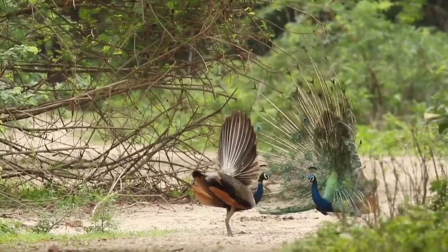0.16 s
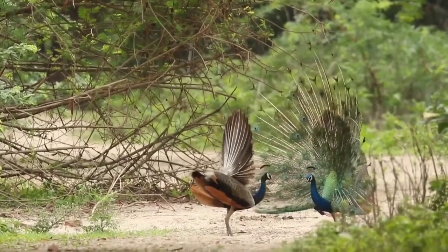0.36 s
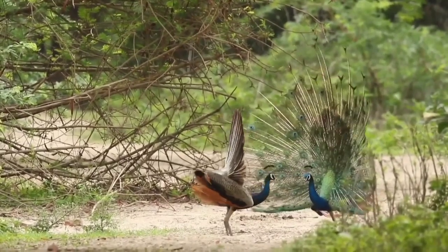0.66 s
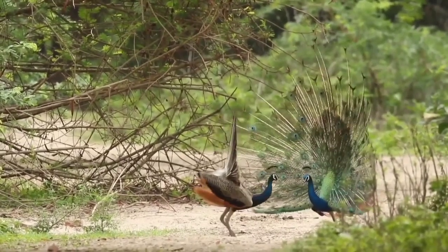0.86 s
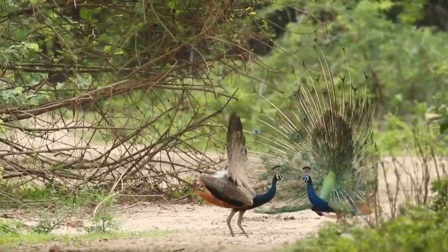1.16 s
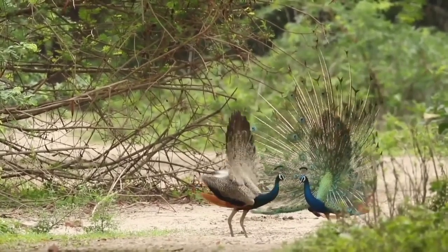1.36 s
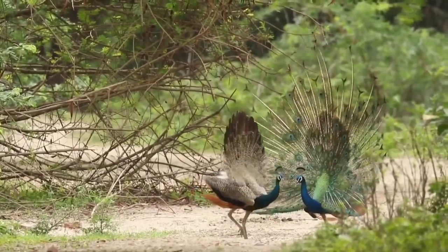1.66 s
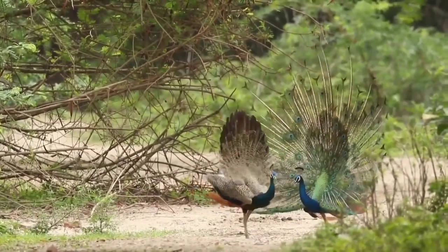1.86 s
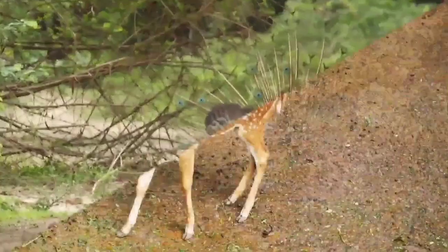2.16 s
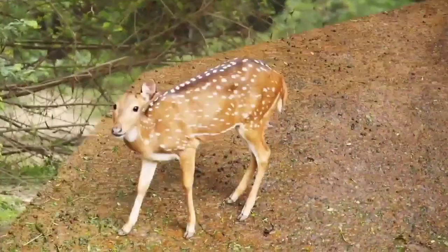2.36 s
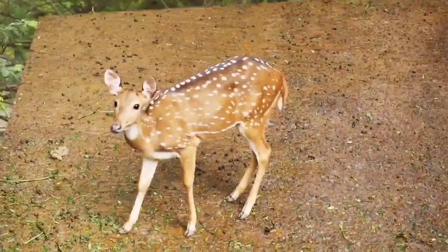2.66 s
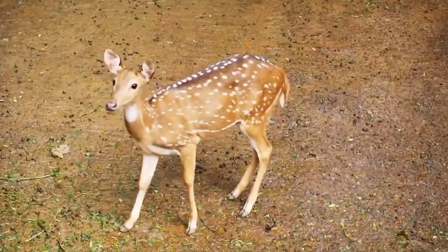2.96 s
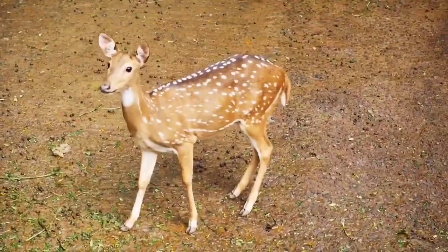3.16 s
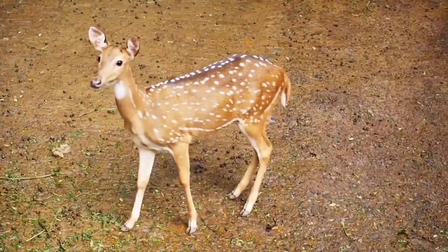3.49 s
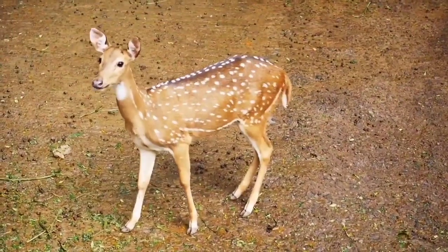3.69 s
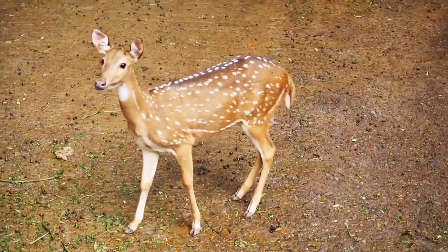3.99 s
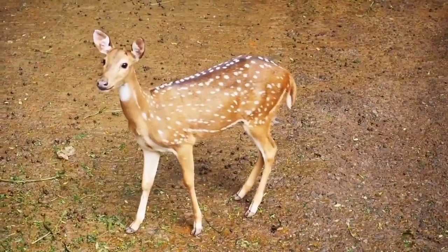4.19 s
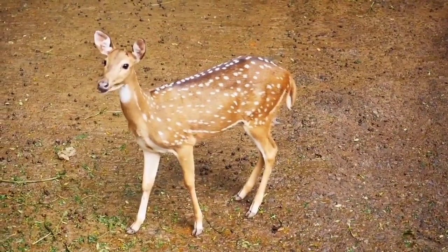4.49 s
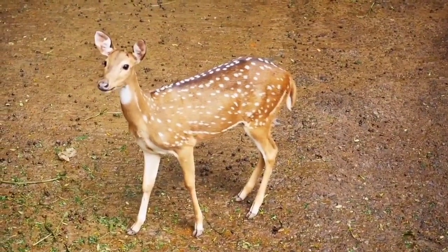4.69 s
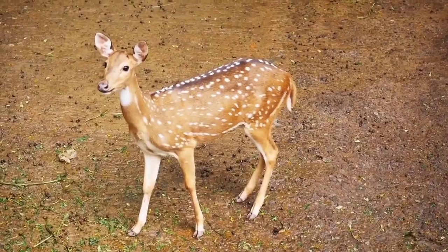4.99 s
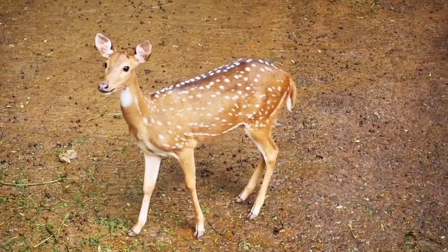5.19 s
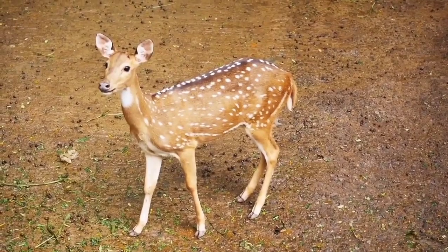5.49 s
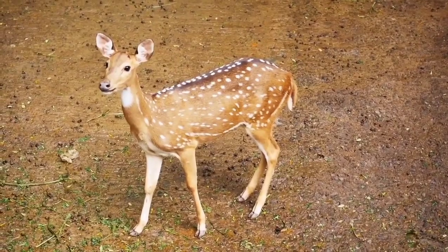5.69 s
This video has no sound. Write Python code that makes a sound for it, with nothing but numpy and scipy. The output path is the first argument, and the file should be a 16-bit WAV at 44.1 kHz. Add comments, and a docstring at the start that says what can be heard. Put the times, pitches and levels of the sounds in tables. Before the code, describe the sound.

First scene: open scrubland, airy broadband hush, a peacock's brassy cry leaping up and falling, close and clear, a few faint far notes and ticks after. It fades out to a short silence. Second scene: dark low forest hush, a stag's pulsed groan opening into a rough, deep roar, reverberant among trunks, a pause filled with echo, then another roar, still bellowing as the sound stops.

```python
"""A stag roars twice in a forest: each roar starts as a pulsed groan, then its larynx sinks, the throat
resonances slide down and the voice turns loud and harsh. Fold pulses and air puffs drive moving resonances;
sparse echoes make the trees ring after it. Before that, a peacock gives one long arched cry, a stack of
harmonics, over the wash of open scrubland with soft notes and a ticking insect. The wash, shaped noise,
fades to silence before the forest air, also shaped noise, sets in."""
import sys
import numpy as np
from scipy import signal
from scipy.fft import rfft, irfft
from scipy.io import wavfile
from scipy.ndimage import uniform_filter1d

SR = 44100
rng = np.random.default_rng(int(sys.argv[2]) if len(sys.argv) > 2 else 0)


def bounce(signal):
    """Save signal as a 16-bit WAV file at the path given by the first command-line argument."""
    frames = np.transpose(np.atleast_2d(signal))
    limited = np.clip(frames, -1, 1)
    pcm = np.round(limited * 32767).astype(np.int16)
    wavfile.write(sys.argv[1], SR, pcm)


N = 257984
TIME = np.arange(N) / SR

# The roars. Each row: start in seconds, end in seconds, moment the larynx is half sunk in seconds,
# time scale of the sinking in seconds, moment the bellow breaks out in seconds,
# moment the chest tone has half joined in seconds.
ROARS = [(3.003, 4.409, 3.40, 0.22, 3.585, 3.46), (4.967, 5.85, 5.46, 0.34, 5.645, 5.69)]
# The stag's vocal folds, one list per roar. Each row: time in seconds, pitch in Hz once the opening
# creak is over, roughness from 0 to 1.
FOLDS = [
    [(3.28, 124.9, 0.19), (3.41, 126.1, 0.4), (3.455, 175.6, 0.4), (3.57, 206.3, 0.3), (3.72, 202.8, .66),
     (3.88, 191.1, .7), (3.99, 189.5, .62), (4.04, 177, 0), (4.09, 177.2, .14), (4.2, 162.3, .58),
     (4.33, 102.8, .6), (4.42, 84.7, 0.49)],
    [(5.1, 114.2, 0.3), (5.35, 114.5, 0.07), (5.56, 121.6, .16), (5.67, 137.1, .25), (5.72, 159.6, 0.39),
     (5.85, 168.5, 0.57)],
]
# Vocal effort, one list per roar. Each row: time in seconds, level in dB before the overall trim.
EFFORT = [
    [(3.03, -51.5), (3.116, -28), (3.494, -15.5), (3.51, -11.5), (3.638, -9.5), (3.658, -13.5),
     (3.958, -12), (3.968, -16), (4.044, -13), (4.39, -20.5)],
    [(4.985, -37.5), (5.069, -29), (5.421, -21.5), (5.497, -18.5), (5.513, -22.5), (5.559, -12.5),
     (5.589, -16), (5.655, -9.5), (5.699, -14), (5.791, -14.5), (5.83, -12.5)],
]
# Quick reflections from near trunks. Each row: frequency in Hz, decay time t60 in seconds.
NEAR_T60 = [(200, .22), (1000, .15), (4000, .13)]
NEAR_DB, NEAR_BUILD_S = -9.5, 0.0012
# Pitches at which the forest rings on. Each row: frequency in Hz, width in Hz, gain in dB of the added resonance.
RINGS = [(336.4, 60, 10), (413, 120, 1), (478, 31, 8), (756, 160, 8), (1208, 41, 11.5), (1870, 330, 1.5)]
# Long decay among the trees. Each row: frequency in Hz, decay time t60 in seconds.
TREES_T60 = [(170, 0.59), (400, 1.82), (1000, 1.59), (2200, 2.22), (3500, 2.4), (9000, .6)]
TREES_DB, TREES_BUILD_S = -13.5, 0.053
# Level difference between the ears. Each row: frequency in Hz, left minus right in dB.
STAG_SIDE = [(110, -.5), (200, -2.2), (380, 1.5), (700, .7), (1290, 3.5), (2380, 1.7), (4400, 4), (9000, 0)]
# Phase difference between the ears. Each row: frequency in Hz, lead of the left ear in radians.
STAG_PHASE = [(200, 0), (380, .8), (550, .4), (1000, 0), (5000, -.3)]


def stag():
    """Reverberation: two roars, with quick reflections from near trunks and the long ring of the forest."""
    dry = np.zeros(N)
    for row, folds_curve, effort_curve in zip(ROARS, FOLDS, EFFORT):
        start, sound = roar(row, folds_curve, effort_curve)
        add(dry, start, sound)
    near = gain_of(NEAR_DB) * echoes(dry, NEAR_T60, NEAR_BUILD_S)
    ringing = dry + sum(gain_of(db) * resonate(dry, np.full(N, hz), width) for hz, width, db in RINGS)
    far = gain_of(TREES_DB) * echoes(ringing, TREES_T60, TREES_BUILD_S)
    # half of each interaural difference goes to either ear
    hz = np.fft.rfftfreq(2 * N, 1 / SR)
    ears = np.array([[0.5], [-0.5]])
    place = gain_of(ears * read(STAG_SIDE, hz)) * np.exp(1j * ears * read(STAG_PHASE, hz))
    closing = ramp((TIME[-1] - TIME) / 0.008)
    return irfft(rfft((dry + near + far) * closing, 2 * N) * place)[:, :N]


# Each roar starts as a slow creak, at this share of its pitch, that speeds up to it.
CREAK_SHARE, CREAK_S = 0.47, 0.16
LARYNX_REST = 0.075  # how far the larynx has sunk at the start, 0-1
OPEN_AIR = 0.39  # least share of air through the fully lowered throat, even when the voice is clear
# The chest resonance: frequency in Hz with larynx high, frequency in Hz with larynx low, width in Hz.
BOOM = (230.6, 198.5, 54)
# the chest tone against the effort, before and after it joins, and how long that takes
CHEST_SHUT_DB, CHEST_OPEN_DB, CHEST_OPENS_S = -11.5, 4, 0.076
CHEST_FULL_DB = -14.5  # beyond this effort the chest tone grows no louder
SURGE_S = 0.076  # half length of the surge as the bellow breaks out
# Lower throat resonances. Each row: frequency in Hz with larynx high, frequency in Hz with larynx low,
# relative level in dB with larynx high, relative level in dB with larynx low.
THROAT = [(683, 404.6, -11, 11.5), (993, 439.6, -1.5, 7.5), (1485, 904, -4, 6.5), (1557, 961, -1, -13.5),
          (1723, 1267, 2.5, -3), (1986, 1505, -4, -7), (1954, 1780, -19, -14.5), (2257, 1990, -21.5, -8),
          (2290, 2250, -30, -12)]
# Upper resonances. Each row: frequency in Hz with larynx high, frequency in Hz with larynx low,
# relative level in dB with larynx high, relative level in dB with larynx low.
MUZZLE = [(3150, 2300, -0.5, 12.5), (3710, 2600, -0.5, 3.5), (4060, 3168, -15, 4), (3307, 3500, 1, -2.5),
          (2770, 3850, -12.5, -5.5), (4080, 4226, -21.5, -8.5), (4950, 5290, -30.5, -14.5),
          (5750, 6450, -32, -22)]


def roar(row, folds_curve, effort_curve, jitter=0.034, shimmer=0.74, hiss=1.0, attack_s=0.052,
         release_s=0.05, air_db=-32, snap_db=-10, level_db=-1.09):
    """Source and filter: fold pulses, mixed with air puffs as they roughen, drive the long throat."""
    start, end, sink_at, sink_s, break_at, chest_at = row
    t = np.arange(start, end + release_s, 1 / SR)
    hz, rough = curves(folds_curve, t)
    rough = np.clip(rough, 0, 1)
    effort = curves(effort_curve, t)[0] + level_db
    hz = hz * (CREAK_SHARE + (1 - CREAK_SHARE) * ramp((t - start) / CREAK_S))
    descent = (1 + np.tanh(2 * (t - sink_at) / sink_s)) / 2
    sunk = np.clip(LARYNX_REST + (1 - LARYNX_REST) * descent, 0, 1)
    turns = np.cumsum(hz * (1 + jitter * rough * wander(t, 98))) / SR

    # the fold harmonics reach up to about 4 kHz
    folds = sum(np.clip((4100 - k * hz) / 400, 0, 1) * np.cos(2 * np.pi * k * turns) for k in range(1, 64))
    pulses = 0.5 * steadied(folds) * (1 + shimmer * rough * wander(t, 87))
    # air noise, strongest just after each pulse
    puffs = evened((0.35 + np.exp(-(turns % 1) / 0.18)) * rng.standard_normal(N)[:len(t)])
    drive = (1 - rough) * pulses + hiss * rough * puffs

    # the lowest resonance favours the harmonic nearest to it
    high_hz, low_hz, width = BOOM
    shaken = folds * (1 + 0.56 * rough * wander(t, 60))
    boom = resonate(shaken, high_hz + (low_hz - high_hz) * sunk, width)
    chest_open = ramp((t - chest_at) / CHEST_OPENS_S + 0.5)
    chest_db = CHEST_SHUT_DB + (CHEST_OPEN_DB - CHEST_SHUT_DB) * chest_open
    chest = gain_of(np.minimum(effort, CHEST_FULL_DB) + chest_db) * band(boom, 130, 500)

    # while the throat is still short, each pulse also snaps straight out of the mouth
    snap = gain_of(snap_db) * (1 - sunk) ** 3 * pulses
    throat = tract(drive, sunk, THROAT) + snap
    air = np.maximum(rough, OPEN_AIR * sunk) * puffs
    muzzle = tract(drive + air, sunk, MUZZLE) + 0.5 * snap + gain_of(air_db) * air

    registers = [band(throat, 280, 700), band(throat, 700, 2700), band(muzzle, 2500, 11000)]
    surge = np.exp(-((t - break_at) / SURGE_S) ** 2)
    levels = registers_db(effort, sunk, rough, surge, t - start)
    sound = chest + sum(gain_of(db) * steadied(part) for db, part in zip(levels, registers))
    return start, sound * ramp((t - start) / attack_s) * np.clip((t[-1] - t) / release_s, 0, 1)


def tract(drive, sunk, modes):
    """Tube resonance: each mode glides to its low-larynx frequency and level; higher modes are wider."""
    out = 0
    for hz0, hz1, db0, db1 in modes:
        width = 55 + 0.055 * hz1
        glide = hz0 * (hz1 / hz0) ** sunk
        out = out + gain_of(db0 + (db1 - db0) * sunk) * resonate(drive, glide, width)
    return out


# Balance of the bellow against the voice, and of the rasp against the effort. Each holds: level in dB
# with larynx high, level in dB with larynx low, exponent for how late in the sinking it changes.
BELLOW = (-15.5, 1.1, 1.7)
RASP = (-11, -25, 4.5)
BELLOW_DB_PER_ROUGH = 14  # harshness favours the bellow over the voice above it
SURGE_DB = 7.5  # the bellow surges as it breaks out
RASP_LATE_DB, RASP_LATE_S = -7.5, 0.25  # the rasp comes in a little after the voice


def registers_db(effort, sunk, rough, surge, age_s):
    """Spectral tilt: the weight of bellow, voice and rasp moves down as the larynx sinks."""
    tilt, rasp = [high + (low - high) * sunk ** late for high, low, late in (BELLOW, RASP)]
    tilt = tilt + BELLOW_DB_PER_ROUGH * sunk * (rough - 0.4) + SURGE_DB * surge
    # bellow and voice together carry the power of the effort
    voice = effort - 10 * np.log10(1 + gain_of(tilt) ** 2)
    return voice + tilt, voice, effort + rasp + RASP_LATE_DB * np.exp(-age_s / RASP_LATE_S)


# The cry, a short level note that leaps into a long arch. Each row: time in seconds, pitch in Hz.
CRY_PITCH = [(.24, 598), (0.294, 643.2), (.382, 635.6), (0.423, 758.7), (0.506, 820.4), (0.589, 863.5),
             (0.682, 874.3), (0.762, 869), (.91, 843.5), (.984, 820), (1.115, 629.4)]
CRY_ATTACK_S, CRY_RELEASE_S, BLARE_ATTACK_S = 0.018, 0.02, 0.065
CRY_JITTER = 0.00063  # relative pitch jitter
FULL_VOICE_HZ = 843  # the higher the pitch, the harder the bird pushes, up to full voice here
# Parts of the cry: first harmonic, third harmonic, upper harmonics, their top range.
# Each holds: base level in dB at full voice, loss in dB per 100 Hz below it.
FUNDAMENTAL = (-19.5, 3.6)
OVERTONE = (-26, 1.7)
BLARE = (-30.5, 6)
EDGE = (-38.5, 16)
# The second harmonic, which carries the cry. Each row: time in seconds, level in dB before a small trim.
SECOND = [(0.26, -24.5), (0.352, -23.5), (0.488, -11), (0.522, -22.5), (0.548, -16), (0.656, -23),
          (0.766, -17), (0.81, -10), (0.876, -7.5), (1.054, -15.5), (1.11, -33.5)]
# as the second harmonic swells past this level, the third gives way (dB, dB per dB)
SWELL_DB, GIVE_WAY = -14.5, 2.0
# The windpipe lifts the third harmonic as it passes: frequency in Hz, half width in Hz, lift in dB.
WINDPIPE = (1961, 73, 12.6)
# Hoarse moments, in the leap and in the fall. Each row: time in seconds, half length in seconds,
# jitter added as a multiple of the usual.
HOARSE = [(0.44, 0.06, 15), (1.063, 0.07, 8.7)]
TIRE_S, TIRE_DB = 0.33, -6  # over its last stretch the cry tires
# Colour of the upper harmonics. Each row: frequency in Hz, relative level in dB.
BEAK = [(2400, 0), (3400, -5), (4400, -6.5), (6000, -8), (7500, -6), (9600, 0.5), (11500, -7), (13000, -7),
        (15500, -24.5)]
# Decay among the bushes. Each row: frequency in Hz, decay time t60 in seconds.
BUSH_T60 = [(600, 0.38), (1700, 0.51), (4000, 0.67), (12000, 0.51)]
BUSH_DB, BUSH_BUILD_S = -4.5, 0.0043


def peacock(lag_s=0.00003, scatter=0.92, flutter_hz=16, second_db=0.2, side_db=-0.3):
    """Harmonic series: a trumpeting stack, brighter as it climbs; bush scatter makes its top flutter."""
    t = np.arange(CRY_PITCH[0][0], CRY_PITCH[-1][0], 1 / SR)
    hz = curves(CRY_PITCH, t)[0]
    second = curves(SECOND, t)[0] + second_db
    slack = np.maximum(FULL_VOICE_HZ - hz, 0) / 100
    first, third, blare, edge = [db - loss * slack for db, loss in (FUNDAMENTAL, OVERTONE, BLARE, EDGE)]
    tired = TIRE_DB * ramp(1 - (t[-1] - t) / TIRE_S)
    pipe_hz, pipe_width, pipe_db = WINDPIPE
    third = third + pipe_db / (1 + ((3 * hz - pipe_hz) / pipe_width) ** 2)
    third = third - GIVE_WAY * np.maximum(second - SWELL_DB, 0)

    strain = 1 + sum(times * np.exp(-((t - s) / length) ** 2) for s, length, times in HOARSE)
    turns = np.cumsum(hz * (1 + CRY_JITTER * strain * wander(t, 120))) / SR
    turns = turns - np.array([[0], [lag_s]]) * hz  # the left ear hears it first
    lowest_db = [first + tired, second, third]
    cry = sum(gain_of(db) * np.sin(2 * np.pi * (k + 1) * turns) for k, db in enumerate(lowest_db))

    opened = ramp((t - t[0]) / BLARE_ATTACK_S) * ramp((t[-1] - t) / BLARE_ATTACK_S)
    for k in range(4, 21):
        top = np.clip((k * hz - 6000) / 2500, 0, 1)
        db = read(BEAK, k * hz) + (1 - top) * blare + top * edge + tired
        # one part of the flutter is shared, the other is separate for each ear
        shared = wander(t, flutter_hz)
        separate = np.array([wander(t, flutter_hz), wander(t, flutter_hz)])
        flutter = 1 + scatter * (shared + 1j * separate)
        harmonic = np.exp(2j * np.pi * k * turns + 1j * k * k)  # the beak disperses each pulse
        cry += opened * gain_of(db) * (flutter * harmonic).real

    envelope = ramp((t - t[0]) / CRY_ATTACK_S) * ramp((t[-1] - t) / CRY_RELEASE_S)
    out = np.zeros((2, N))
    add(out, t[0], np.sqrt(2) * cry * envelope)
    bushes = gain_of(BUSH_DB) * echoes(out, BUSH_T60, BUSH_BUILD_S)
    return (out + bushes) * gain_of([[-side_db], [side_db]])


# Colour of the scrubland. Each row: frequency in Hz, relative spectral density in dB per Hz.
SCRUB = [(15, -30), (25, -19), (70, -0.5), (113, -7.5), (235, -5.5), (299, -9), (636, -4), (928, 1),
         (1250, -6), (1640, -7.5), (3980, -30.5), (5080, -29.5), (6130, -34), (9440, -33.5), (15800, -37.5)]
SCRUB_DB = -37.5
# Soft far notes. Each row: start in seconds, length in seconds, frequency in Hz,
# level in dB before a doubling of the amplitude.
NOTES = [(0.657, 0.026, 640, -38.5), (0.763, 0.018, 655, -35.5), (1.068, 0.069, 245, -47),
         (1.314, 0.25, 237, -50.5)]
# An insect's bursts of ticks. Each row: start in seconds, length in seconds, rms level in dB.
TICKS = [(.0, 0.2, -72), (1.214, 0.21, -65.5), (2.031, 0.1, -77)]
# the wash holds, then fades to silence
FADE_START_S, FADE_END_S, FADE_POWER = 1.553, 2.208, 0.96


def scrubland():
    """Broadband noise of leaves and far air, with a few soft pure tones and an insect's pulsed ticking."""
    life = np.zeros(N)
    for s, length, hz, db in NOTES:
        t = np.arange(0, length, 1 / SR)
        add(life, s, gain_of(db) * np.hanning(len(t)) * np.sin(2 * np.pi * hz * t) * 2)
    for s, length, db in TICKS:
        t = np.arange(0, length, 1 / SR)
        decay = np.exp(-(t * 36 % 1) / 0.19)  # 36 ticks per second
        ticks = decay * wander(t, 250) * np.sin(2 * np.pi * 5250 * t)
        add(life, s, gain_of(db) * evened(ticks))
    fade = np.clip((FADE_END_S - TIME) / (FADE_END_S - FADE_START_S), 0, 1) ** FADE_POWER
    air = gain_of(SCRUB_DB) * fade * wash(SCRUB, same=0.6)
    return life + air * gain_of([[-0.6], [0.6]])


# Colour of the forest air. Each row: frequency in Hz, relative spectral density in dB per Hz.
FOREST = [(24, -70), (50, -32), (75, -6), (130, 0), (250, -5), (450, -5), (700, -13), (1200, -16),
          (2200, -23), (4000, -32), (8000, -39), (15800, -44)]
FOREST_DB = -47


def forest():
    """Broadband noise: low forest air that sets in abruptly."""
    onset = np.clip((TIME - 2.822) / 0.0053, 0, 1)
    return gain_of(FOREST_DB) * wash(FOREST, same=0.36) * onset


PATCHY_DB = 1.5  # rms depth of the drifting patches


def wash(colour, same):
    """Partial coherence: coloured noise with drifting patches, partly alike in both ears."""
    frames, hz = N // 512 + 5, np.fft.rfftfreq(2048, 1 / SR)
    a, b, c, d, patches = rng.standard_normal((frames, len(hz), 5)).T
    patches = evened(uniform_filter1d(uniform_filter1d(patches, size=16, axis=0), size=8, axis=1))
    same = np.clip(same, -1, 1)
    left = a + 1j * b
    right = same * left + np.sqrt(1 - same ** 2) * (c + 1j * d)
    z = np.array([left, right]) * gain_of(read(colour, hz)[:, None] + PATCHY_DB * patches)
    return evened(signal.istft(z, nperseg=2048, noverlap=1536)[1][:, :N])


def echoes(x, t60, build_s):
    """Diffuse decay: sparse reflections build up, then die band by band, independently for each ear."""
    density = 2500  # reflections per second
    taps = rng.standard_normal((2, 2 * SR)) * (rng.random((2, 2 * SR)) < density / SR)
    hz, t, z = signal.stft(taps, SR, nperseg=256)
    shape = gain_of(-60 * t / read(t60, hz)[:, None]) * (1 - np.exp(-t / build_s))
    # the energy of the band near 1 kHz sets the level
    energy = np.sum(shape[6] ** 2) * 128 * density / SR
    tail = signal.istft(z * shape / np.sqrt(energy), SR, nperseg=256)[1]
    return signal.fftconvolve(np.atleast_2d(x), tail, axes=1)[:, :N]


def resonate(x, hz, width):
    """Heterodyne resonance: two equal poles, peak gain 1, that follow the curve hz."""
    turn = np.exp(2j * np.pi * np.cumsum(hz) / SR)
    r = np.exp(-np.pi * width / SR)
    return 2 * (turn * signal.lfilter([(1 - r) ** 2], [1, -2 * r, r * r], x / turn)).real


def band(x, low_hz, high_hz):
    """Zero-phase filtering: a steep band-pass without delay."""
    return signal.sosfiltfilt(signal.butter(3, [low_hz, high_hz], "band", fs=SR, output="sos"), x)


def wander(t, hz):
    """Low-passed noise: smooth chance, mostly slower than hz, of rms 1 over the whole scene's length."""
    noise = rfft(rng.standard_normal(N))
    return evened(irfft(noise / (1 + (np.fft.rfftfreq(N, 1 / SR) / hz) ** 4), N))[:len(t)]


def gain_of(db):
    """Logarithmic level: decibels to amplitude."""
    return 10 ** (np.asarray(db) / 20)


def evened(x):
    """Mean power: scales to rms 1."""
    return x / np.sqrt(np.mean(x ** 2) + 1e-20)


def steadied(x, size=1500):
    """Short-time power: holds the running rms near 1."""
    return x / np.sqrt(uniform_filter1d(uniform_filter1d(x ** 2, size), size) + 1e-14)


def ramp(x):
    """Raised-cosine transition: a smooth step from 0 to 1."""
    return np.sin(np.pi / 2 * np.clip(x, 0, 1)) ** 2


def read(points, hz):
    """Interpolation of a spectrum table on a log-frequency axis."""
    f, value = np.transpose(points)
    return np.interp(np.log(hz + 1), np.log(f + 1), value)


def curves(rows, t):
    """Linear interpolation: each column of a table at the times t."""
    s, *columns = np.transpose(rows)
    return [np.interp(t, s, c) for c in columns]


def add(mix, s, sound):
    """Superposition: mixes a sound in at s seconds."""
    part = mix[..., max(round(s * SR), 0):][..., :sound.shape[-1]]
    part += sound[..., :part.shape[-1]]


def scene():
    """Superposition of two scenes: the scrubland with its peacock, then the forest with its stag."""
    return stag() + peacock() + scrubland() + forest()


EDGE_HZ = 15850  # upper band limit


def record(dry):
    """Soft saturation rounds off the loudest peaks; then a linear-phase low-pass limits the band."""
    rounded = dry / (1 + (dry / 1.05) ** 10) ** 0.1
    lowpass = signal.firwin(511, EDGE_HZ, window=("kaiser", 9), fs=SR)
    return signal.oaconvolve(rounded, lowpass[None], "same")


dry = scene()
out = record(dry)
bounce(out)
```